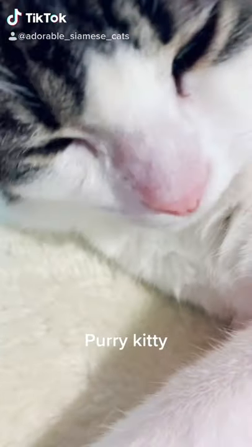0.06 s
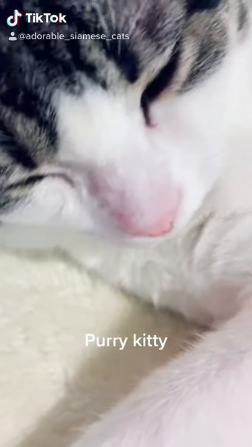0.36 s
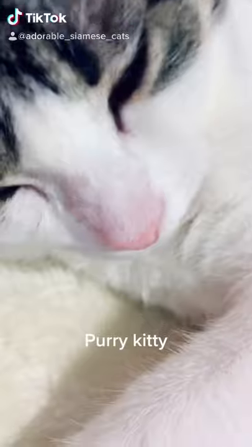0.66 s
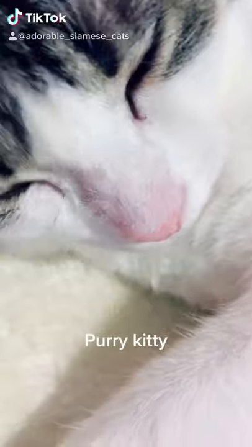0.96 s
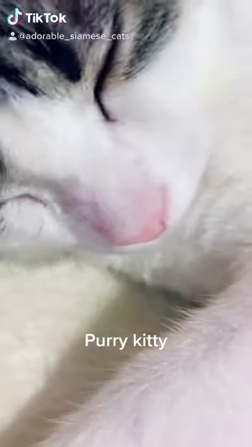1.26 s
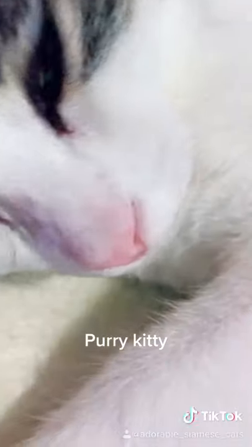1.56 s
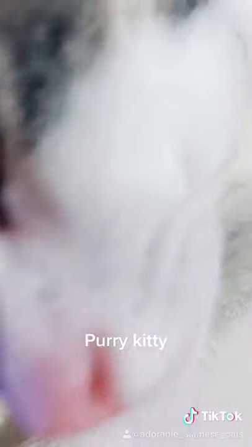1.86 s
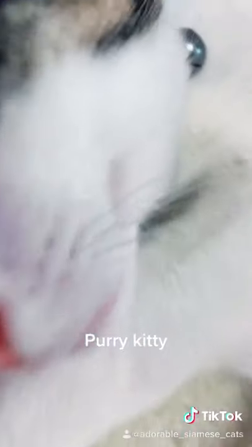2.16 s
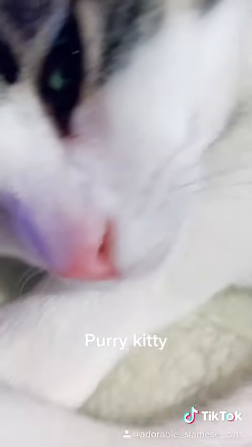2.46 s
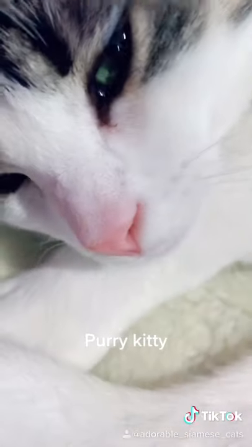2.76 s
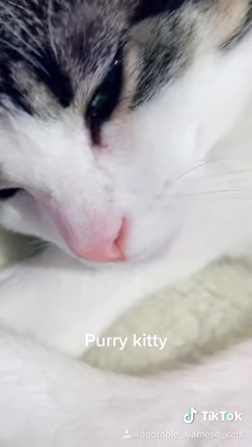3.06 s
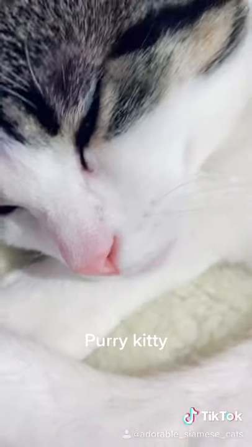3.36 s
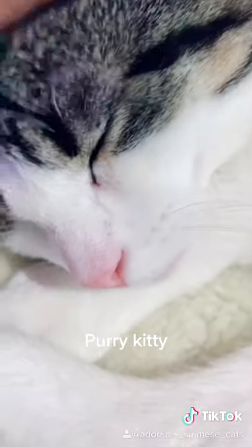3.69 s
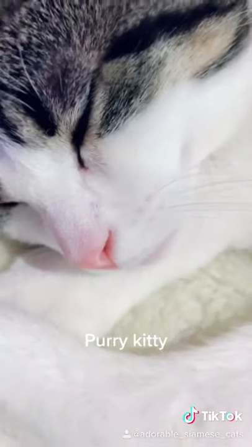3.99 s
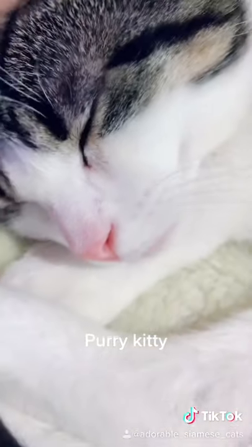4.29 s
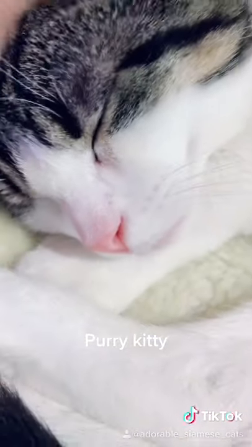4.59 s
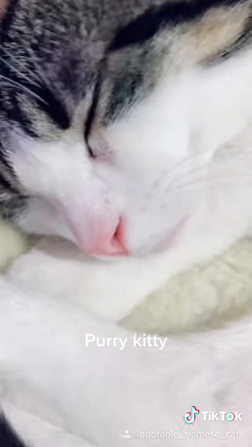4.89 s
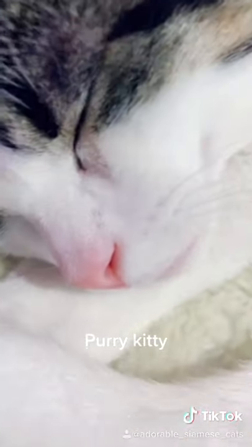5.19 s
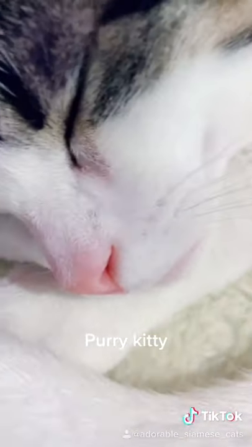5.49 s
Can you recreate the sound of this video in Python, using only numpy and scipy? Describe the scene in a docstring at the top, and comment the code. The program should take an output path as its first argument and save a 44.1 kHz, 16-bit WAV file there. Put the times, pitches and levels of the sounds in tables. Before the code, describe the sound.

A dozing cat purrs on a blanket right in front of a handheld microphone in a quiet room. The purr starts softly under a scatter of sharp little clicks, then grows fuller and pulses on, dipping briefly at each turn of the breath. The bedding rustles and a few dull bumps touch the microphone midway. Faint air passes through the cat's nose. Everything sounds dry and close.

```python
"""A dozing cat purrs on a blanket, right in front of a handheld phone.
Its larynx snaps open about 28 times a second, in stretches that follow its breathing, and air
puffs and whistles faintly through its nose. Light ticks and padded bumps land on the phone,
the bedding rustles, and the hand rumbles over a quiet room.
The microphone passes low notes late, so every snap and tick is a tiny falling chirp."""
import sys
import numpy as np
from scipy import signal
from scipy.fft import rfft, irfft
from scipy.io import wavfile
from scipy.ndimage import uniform_filter1d

SR = 44100
rng = np.random.default_rng(int(sys.argv[2]) if len(sys.argv) > 2 else 0)


def dump_mix(stems):
    """Bounce the given channels to the path in sys.argv[1] as a 16-bit WAV at rate SR."""
    frames = np.atleast_2d(stems).T  # one column per channel
    limited = np.clip(frames, -1, 1)  # hard clip at full scale
    pcm = np.round(limited * 32767).astype(np.int16)
    wavfile.write(sys.argv[1], SR, pcm)


N = 253134
TIME = np.arange(N) / SR
TURN_DB = -9.5  # purr and airflow duck at each turn of the breath

# the cat's half breaths:
# first_pulse_s, last_pulse_s, glide_hz, start_effort_db, end_effort_db, airflow_db, direction (in/out)
BREATHS = [ (0.009, 0.643, -0.6, -14, -16, 2.5, "out"), (0.679, 1.158, 0.3, -32, -19, -6, "in"),
           (1.194, 1.751, 1.24, -17, 0, -2.5, "out"), (1.786, 2.381, -0.19, 1.5, -1, 0, "in"),
           (2.447, 3.412, 0.26, -8, -3.5, 2, "out"), (3.45, 4.214, -.1, -.5, 0.5, -3, "in"),
           (4.248, 5.166, -1.03, 2.5, -6.5, -1.5, "out"), (5.202, 5.753, .1, -4, 0.5, -2, "in")]


def purr(snap_db=-1.5, jitter_s=0.00014, uneven_db=1.0, timbre_spread_db=1.6):
    """Each cycle the larynx shuts softly, then snaps open and lets a puff of air through the nose."""
    # tone of one snap, heard through throat and nose: freq_hz, gain_db
    throat_eq = [(20, -21), (45, 1.5), (90, -0.5), (180, -1.5), (300, -6.5), (500, -9.5), (630, -17.5),
                 (870, -25.5), (1080, -14.5), (1450, -22.5), (1850, -41), (2750, -34), (3800, -45),
                 (9000, -78)]
    snaps, openings = np.zeros(N), np.zeros(N)
    for first, last, glide_hz, start_db, end_db, _, direction in BREATHS:
        # breathing in, the closing comes earlier and is heard as a second beat
        lead_s, closing_db = (0.0112, -4) if direction == "in" else (0.00737, -12)
        for s in pulse_times(first, last, glide_hz, direction):
            effort_db = np.interp(s, [first, last], [start_db, end_db]) + turn_dip(s, first, last)
            open_slip, close_slip, open_force, close_force = rng.standard_normal(4)
            open_s = s + jitter_s * open_slip
            close_s = open_s - lead_s + 2 * jitter_s * close_slip
            # the lows repeat steadily; the upper tones change from snap to snap
            tone = [(hz, db + timbre_spread_db * min(hz / 500, 1) * rng.standard_normal())
                    for hz, db in throat_eq]
            gain = -amp(snap_db + effort_db + uneven_db * open_force)
            closing = amp(closing_db + uneven_db * close_force) * ring(tone, 900, steepness=0.5)
            add(snaps, close_s, gain * closing)
            add(snaps, open_s, gain * ring(tone))
            add(openings, open_s, amp([effort_db]))
    return snaps + nose_air(openings)


def pulse_times(first, last, glide_hz, direction):
    """Larynx cycles at a gliding rate, stretched to fill one half breath."""
    nominal_hz = 27.2 if direction == "in" else 28.7
    cycles = round((last - first) * nominal_hz)
    periods = 1 / (nominal_hz + glide_hz * np.linspace(-0.5, 0.5, cycles))
    return first + (last - first) * np.append(0, np.cumsum(periods)) / periods.sum()


def turn_dip(t, first, last, attack_s=0.03, release_s=0.0091):
    """Envelope in dB of a half breath: it builds quickly, holds, and fades just before the next turn."""
    attack = np.exp(-np.maximum(t - first, 0) / attack_s)
    release = np.exp(-np.maximum(last - t, 0) / release_s)
    return TURN_DB * (attack + release)


def nose_air(openings, base_db=-63, puff_decay_s=0.0042):
    """Breath streams through the nose and puffs at each opening of the larynx."""
    # tone of air in the nose: freq_hz, gain_db
    nose_eq = [(30, -20), (120, -4.5), (250, -3), (500, 0.5), (620, -14), (880, -19), (1150, -12),
               (1500, -17), (2150, -22), (2550, -15), (2820, -14.5), (3150, -23.5), (7800, -36),
               (9500, -48)]
    flow_db = np.full(N, TURN_DB)
    for first, last, *_, airflow_db, direction in BREATHS:
        # the flow nearly holds on the way in and runs down on the way out
        sag_db_per_s = -2 if direction == "in" else -8.5
        stroke_db = airflow_db + sag_db_per_s * (TIME - first) + turn_dip(TIME, first, last)
        flow_db = np.where(TIME >= first, stroke_db, flow_db)
    puffs = signal.lfilter([1], [1, -np.exp(-1 / (puff_decay_s * SR))], openings)
    return amp(base_db + flow_db) * (1 + puffs) * noise(nose_eq)


def whistles():
    """Narrow bands of air noise from the cat's nostrils."""
    # faint whistles and sniffs: middle_s, half_length_s, pitch_hz, half_width_hz, level_db
    sniffs = [(3.026, 0.042, 7800, 120, -75.5), (4.338, 0.021, 3230, 600, -69),
              (4.367, 0.063, 1324, 280, -67), (4.38, 0.13, 7830, 150, -80.5),
              (5.238, 0.027, 7640, 110, -76), (5.342, .018, 3460, 450, -70.5),
              (5.555, 0.14, 8200, 260, -81)]
    out = np.zeros(N)
    for middle, half, pitch_hz, half_width_hz, db in sniffs:
        low_pass = signal.butter(2, half_width_hz, fs=SR, output="sos")
        waver = signal.sosfilt(low_pass, rng.standard_normal(N))
        out += amp(db) * swell(middle, half) * unit(waver * np.cos(2 * np.pi * pitch_hz * TIME))
    return out


def ticks(timbre_spread_db=1.2, fuzz_db=-47.5, fuzz_growth=0.58, fuzz_delay_s=0.0014):
    """Dry taps at varying spots on the casing, each in a brief fuzz of noise, louder for stronger taps."""
    # sharp ticks against the phone: start_s, strength_db, brightness_hz
    taps = [ (0.0295, 13.5, 2640), (0.113, 12.5, 2030), (0.1382, 8, 990), (0.1708, 10, 1460),
            (0.178, -1, 1520), (0.2007, 11.5, 2140), (0.236, 13, 2230), (0.2445, -10, 3870),
            (0.2744, 11, 1220), (0.3052, 15.5, 2900), (0.3306, 12, 1710), (0.354, 12, 1340),
            (0.4094, 12, 2290), (0.4458, 14, 1360), (0.4569, -1, 2920), (0.586, 9, 2940),
            (0.8477, 11.5, 2460), (0.915, 11, 1510), (0.9234, -6, 3480), (0.9338, 13.5, 13900),
            (1.122, -14.5, 3100), (1.1754, 10, 1320), (1.2902, 13.5, 4100), (1.4412, 10, 2800),
            (1.4502, 5.5, 5540)]
    # ring of the casing: freq_hz, gain_db
    casing_eq = [(20, -19), (100, -10), (200, -9.5), (400, -1.5), (700, -1.5), (1400, -7.5), (2800, -9),
                 (4200, -18), (7500, -19), (9200, -31), (11000, -38.5), (14500, -32)]
    hits, fuzz_envelope = np.zeros(N), np.zeros(N)
    for s, db, corner_hz in taps:
        spot_eq = [(hz, gain_db + timbre_spread_db * rng.standard_normal()) for hz, gain_db in casing_eq]
        add(hits, s, amp(db) * ring(spot_eq, corner_hz, steepness=2.25))
        fuzz_envelope += amp(fuzz_db + fuzz_growth * db) * swell(s + fuzz_delay_s, 0.0019)
    return hits + fuzz_envelope * noise(casing_eq, tilt_db_per_octave=-1)


def bumps():
    """Fur and fingers pad against the phone with dull, round pops."""
    # soft touches: start_s, strength_db, brightness_hz
    touches = [(1.1897, -3.5, 910), (1.2616, -8.5, 1400), (2.393, -9.5, 700), (2.409, -1.5, 1030),
               (2.4264, -3.5, 820), (2.5645, -8, 825), (2.613, -6.5, 942), (2.637, -2, 940),
               (2.6798, -0.5, 1140), (2.7917, -8.5, 1400), (2.9541, -4, 1690), (2.9976, -3.5, 970),
               (3.1169, -6, 1860), (3.2072, -6.5, 1700), (3.253, -2, 835), (3.376, -1, 1040)]
    # tone of a padded touch: freq_hz, gain_db
    touch_eq = [(30, -15), (130, -3), (260, 5), (500, 0.5), (850, -11.5), (1400, -13), (2600, -14.5),
                (5000, -16.5)]
    out = np.zeros(N)
    for s, db, corner_hz in touches:
        add(out, s, -amp(db) * ring(touch_eq, corner_hz))
    return out


def bedding(grain_db=2):
    """Fibres slide past each other in short, finely grained strokes as the phone moves."""
    # strokes of fur and cloth: middle_s, half_length_s, level_db, tilt_db_per_octave
    strokes = [ (0.209, 0.0025, -45, -4.5), (0.361, 0.0047, -49, -2.5), (1.167, 0.011, -52, -3.5),
               (1.169, 0.0075, -55.5, 12.5), (1.208, 0.0084, -48.5, -2), (1.25, 0.062, -60, -2.5),
               (2.074, 0.098, -59.5, 3.5), (2.15, 0.25, -64, 1), (2.612, 0.14, -69, 3),
               (2.954, 0.19, -74, 1), (3.52, 0.033, -71, 2), (3.75, 0.021, -67, -3),
               (3.912, 0.00091, -53, 18.5), (4.05, 0.022, -73, 2), (4.235, 0.023, -76, 3),
               (4.538, 0.017, -73, 7), (4.825, 0.02, -80, 11)]
    # tone of sliding cloth: freq_hz, gain_db
    cloth_eq = [(100, -3.5), (500, 13), (1500, 5.5), (3000, -1), (4200, -1.5), (5700, -1.5), (7800, -2),
                (9200, -13), (11000, -18), (14000, -14.5), (16000, -17.5)]
    flicker = unit(uniform_filter1d(rng.standard_normal(N), size=90))
    grain = unit(amp(grain_db * flicker))
    return grain * sum(amp(db) * swell(middle, half) * noise(cloth_eq, tilt)
                       for middle, half, db, tilt in strokes)


def hand_rumble(rest_db=-55.5):
    """Low handling noise that swells at each shift of grip."""
    # shifts of grip: middle_s, half_length_s, level_db
    shifts = [(0.26, 0.08, -51.5), (1.25, .05, -50), (2.17, 0.087, -54), (2.675, 0.099, -50.5),
              (4.25, 0.25, -57), (5.027, 0.051, -48)]
    # tone of the hand on the phone: freq_hz, gain_db
    rumble_eq = [(14, -21), (25, -4.5), (40, 7.5), (58, 0), (80, -2), (130, -18), (250, -16), (600, -74)]
    shift_power = sum((amp(db) * swell(middle, half)) ** 2 for middle, half, db in shifts)
    return np.sqrt(amp(rest_db) ** 2 + shift_power) * noise(rumble_eq)


def room_tone(level_db=-56.5):
    """The steady hush of a quiet room, with microphone hiss."""
    # tone of the hush: freq_hz, gain_db
    room_eq = [(60, 2.5), (160, -1.5), (310, -0.5), (470, -5.5), (620, -12), (1100, -19.5), (2000, -24),
               (4200, -30), (7600, -28.5), (9200, -36.5), (10800, -45.5), (13000, -38), (15500, -34.5)]
    return amp(level_db) * noise(room_eq)


def amp(db):
    """Decibels to gain."""
    return 10 ** (np.asarray(db) / 20)


def unit(x):
    """Scales to an rms of one."""
    return x / np.sqrt(np.mean(x ** 2) + 1e-20)


def eq_gain(eq, hz):
    """Gain of a (freq_hz, gain_db) curve at the frequencies hz."""
    freq_hz, gain_db = np.transpose(eq)
    return amp(np.interp(np.log(hz + 1), np.log(freq_hz + 1), gain_db))


def noise(eq, tilt_db_per_octave=0):
    """Noise of rms one, shaped by an EQ curve and a tilt."""
    hz = np.fft.rfftfreq(N, 1 / SR)
    tilt = amp(tilt_db_per_octave * np.log2(hz + 1))
    return unit(irfft(rfft(rng.standard_normal(N)) * eq_gain(eq, hz) * tilt, N))


def ring(eq, corner_hz=SR, steepness=2.23, size=2048):
    """A body's response to one blow, rolled off above its corner frequency."""
    hz = abs(np.fft.fftfreq(size, 1 / SR))
    rolloff = np.sqrt(1 + (hz / corner_hz) ** (2 * steepness))
    log_gain = np.log(eq_gain(eq, hz) / rolloff + 1e-5)
    minimum_phase = np.exp(np.conj(signal.hilbert(log_gain)))
    return np.fft.ifft(minimum_phase).real[:size // 2]


def swell(middle_s, half_length_s):
    """A bell-shaped rise and fall."""
    return np.exp(-0.5 * ((TIME - middle_s) / half_length_s) ** 2)


def add(mix, start_s, sound):
    """Mixes a sound in at start_s."""
    part = mix[max(round(start_s * SR), 0):][:len(sound)]
    part += sound[:len(part)]


def scene():
    """Everything is close and the blanket soaks up echoes, so the mono mix is dry."""
    return (purr() + whistles() + ticks() + bumps() + bedding() + hand_rumble() + room_tone())[None]


def record(dry, turns=1.156, knee_hz=30, cutoff_hz=16000):
    """The microphone delays each frequency by turns / (hz + knee_hz) seconds and cuts the very top."""
    hz = np.fft.rfftfreq(2 * N, 1 / SR)
    phase_lag = 2 * np.pi * turns * np.log(1 + hz / knee_hz)
    chirped = irfft(rfft(dry, 2 * N) * np.exp(-1j * phase_lag))[:, :N]
    low_pass = signal.firwin(511, cutoff_hz, window=("kaiser", 9), fs=SR)
    return signal.oaconvolve(chirped, low_pass[None], "same")


dry = scene()
out = record(dry)
dump_mix(out)
```